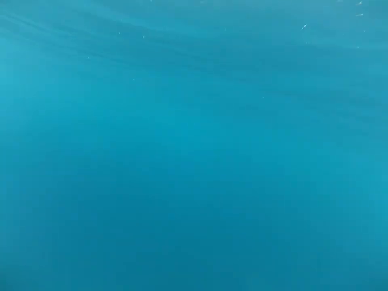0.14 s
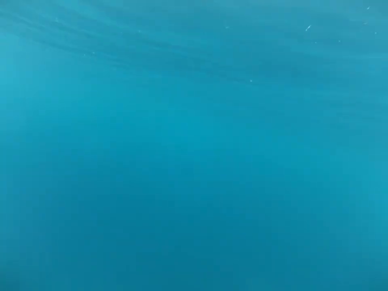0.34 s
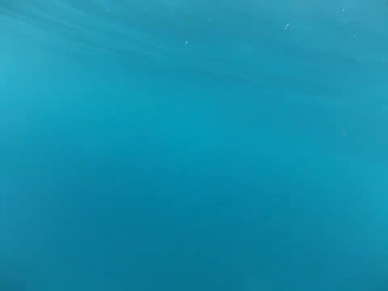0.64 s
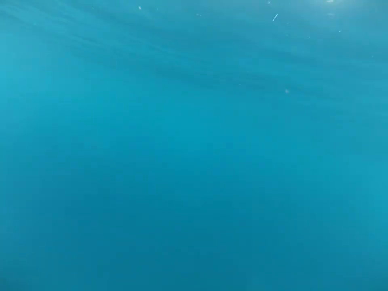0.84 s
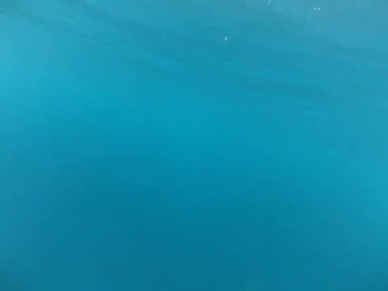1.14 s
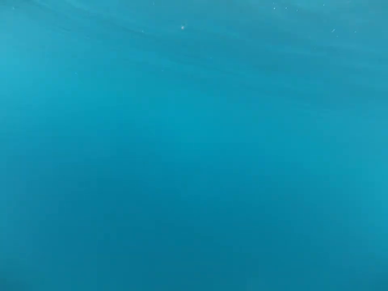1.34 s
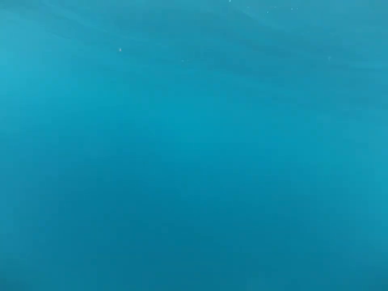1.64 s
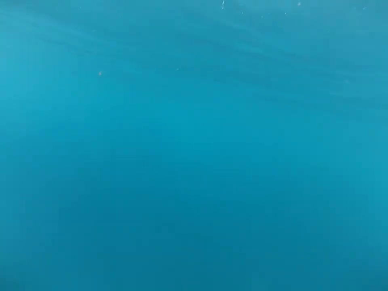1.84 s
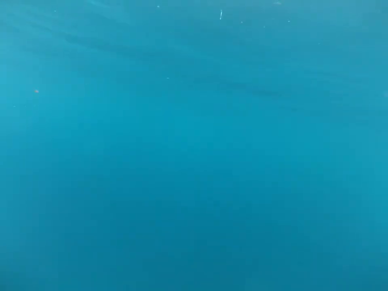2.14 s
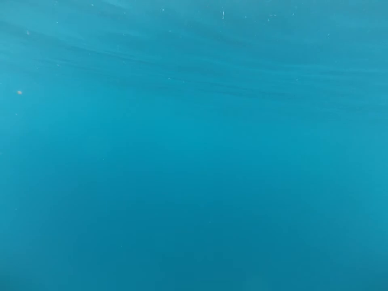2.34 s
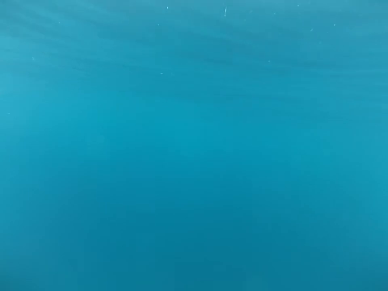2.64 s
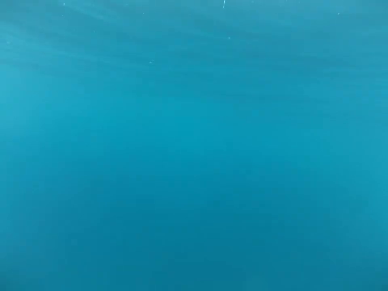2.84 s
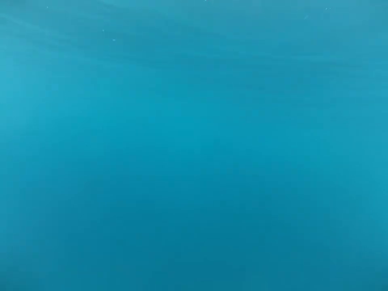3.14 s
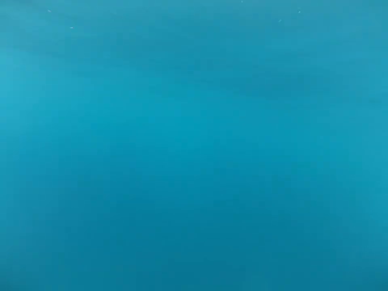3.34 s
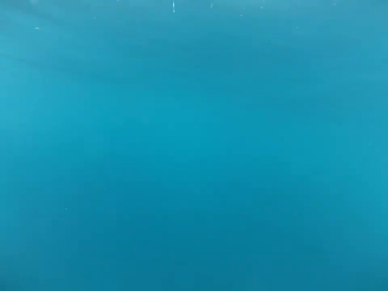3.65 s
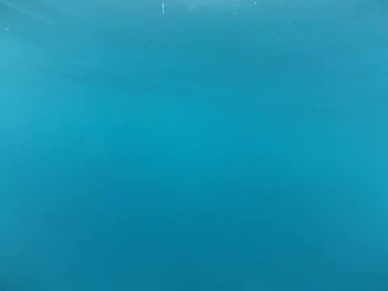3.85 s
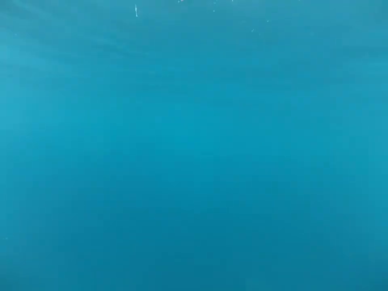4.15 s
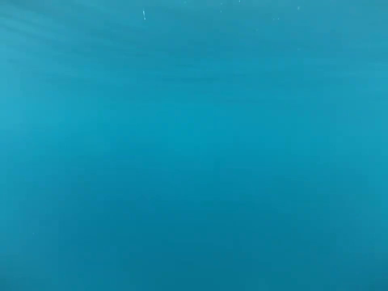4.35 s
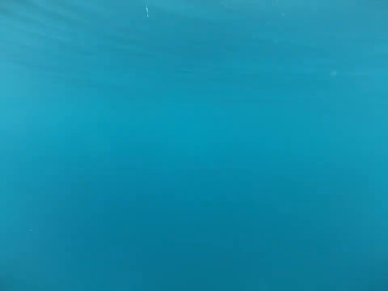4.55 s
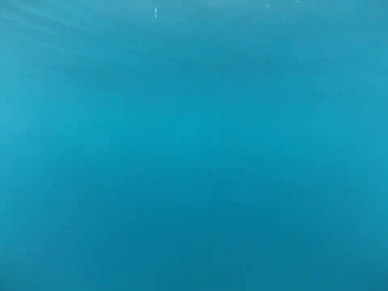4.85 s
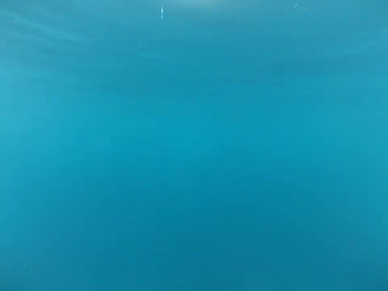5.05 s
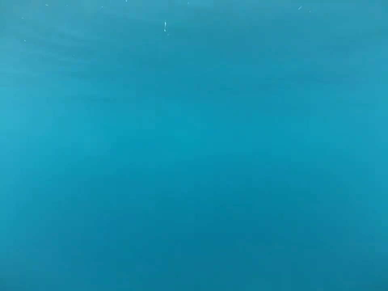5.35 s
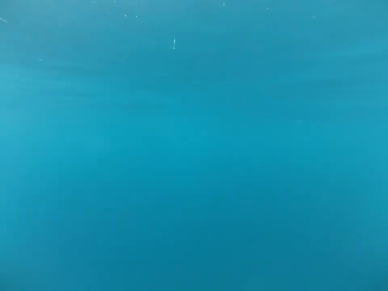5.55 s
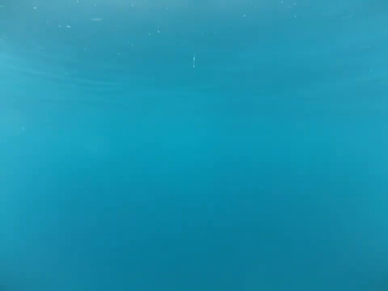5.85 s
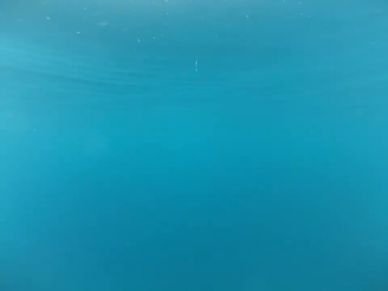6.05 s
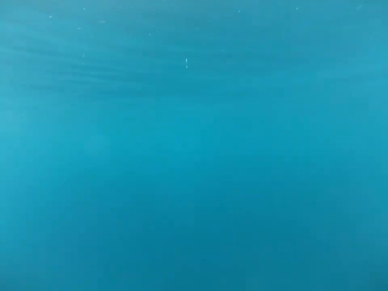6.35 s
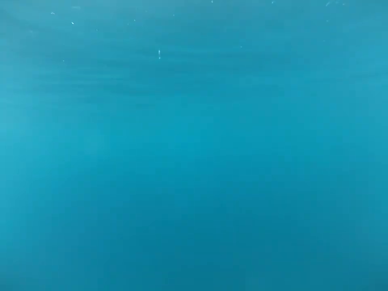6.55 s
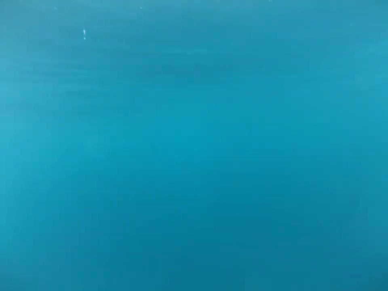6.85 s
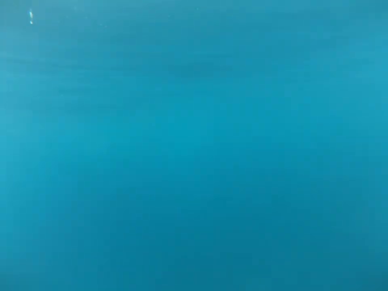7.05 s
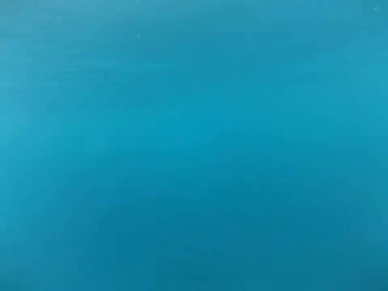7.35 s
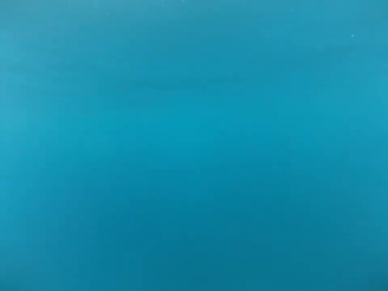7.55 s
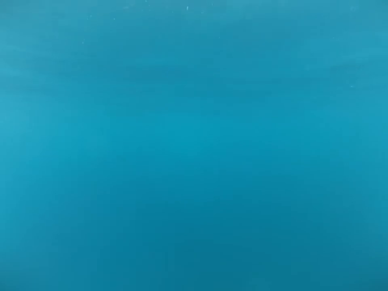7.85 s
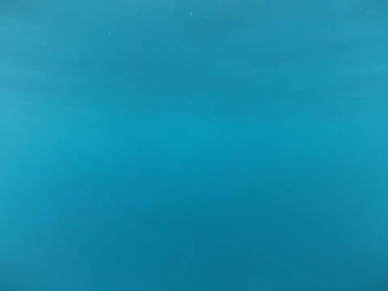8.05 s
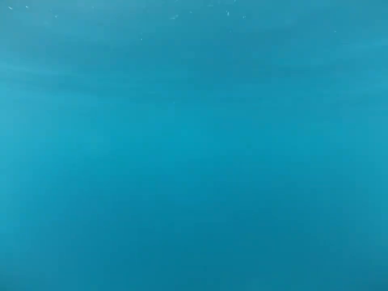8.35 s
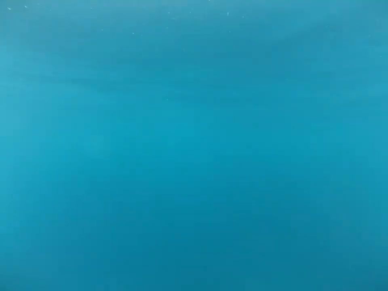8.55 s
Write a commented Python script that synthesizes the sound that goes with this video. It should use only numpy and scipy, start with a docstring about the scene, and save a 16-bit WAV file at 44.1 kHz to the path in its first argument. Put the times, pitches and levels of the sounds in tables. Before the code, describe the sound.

Heard underwater, a boat engine knocks and throbs in a rapid steady clatter over deep water rumble, with gulping bubbles and a rising, falling moan.

```python
"""Boat engine heard under water

Close to a boat, the microphone in a camera housing hears a six-cylinder engine: each firing rings the hull,
loose parts rattle, and steady engine and gear tones throb. Flow buffets the housing at a low pitch, over wash
with random low swells, hiss, bubble clicks and gulps. Far whines, perhaps a whale's, glide up and down.
The camera's electronics add clock overtones, bursts of treble ticks and one faint rough squeal."""
import sys
import numpy as np
from scipy import signal
from scipy.fft import rfft, irfft, next_fast_len
from scipy.io import wavfile
from scipy.ndimage import map_coordinates

SR = 44100
rng = np.random.default_rng(int(sys.argv[2]) if len(sys.argv) > 2 else 0)


def transcribe(signal):
    """Save signal, clipped to [-1, 1], as a 16-bit WAV file at the path in sys.argv[1]."""
    frames = np.atleast_2d(signal).T
    limited = np.clip(frames, -1, 1)
    pcm = np.round(limited * 32767).astype(np.int16)
    wavfile.write(sys.argv[1], SR, pcm)


def convert_level_to_amplitude(level_db):
    """Map a level in decibels to its linear amplitude factor."""
    exponent = np.asarray(level_db, float) / 20
    return 10 ** exponent


N = 383229

CYCLE_HZ = 8.313  # engine cycles a second
FIRST_FIRING = .25  # part of a cycle before the first cylinder fires
# drift of the engine's speed: (time [s], lag behind steady running [ms])
ENGINE_LAG = [(0.03, -0.3), (0.5, 1.6), (0.85, 1), (1.25, -2.5), (1.8, -0.5), (2.2, -2), (2.95, 1.5),
              (3.85, 3), (4.35, 1), (4.7, 2), (5.1, 0.4), (6.0, 0.2), (6.55, 1.36), (7.2, -3), (7.65, -1),
              (8.25, 3.5), (8.6, 0.5)]
# how early each of the six cylinders fires: (lead [ms])
CYLINDER_LEAD = [0, 0, 0, 1, 2, 2]
# hull resonances: (pitch [Hz], width [Hz], delay [ms], then peak level from cylinders 1-6 [dB])
HULL_RESONANCES = [(600, 110, 1, -40, -40, -38, -35, -35, -28.5),
                   (570, 110, 6, -35, -36, -44, -42, -40, -42),
                   (900, 190, .5, -52, -47, -48, -47, -45, -47),
                   (1265, 140, 2.5, -52, -53, -52, -45, -62, -64),
                   (1660, 220, 1, -46, -54, -41, -43, -52, -56),
                   (1735, 260, 0, -33, -46, -40, -40, -46, -49),
                   (2390, 240, -.5, -57, -70, -61, -62, -56, -68),
                   (2920, 300, 0, -60, -58, -56, -58, -55, -64),
                   (2980, 300, 5, -53, -68, -64, -62, -70, -70),
                   (3840, 200, 0, -70, -70, -69, -67, -65, -74),
                   (3860, 200, 6, -65, -80, -78, -72, -80, -80),
                   (7300, 600, -3, -67, -71, -69, -70, -62, -69)]
# engine and gear tones: (multiple of the cycle, level [dB rms])
THROB_TONES = [(6, -32.5), (9, -52.5), (63, -50), (72, -47)]
# colour of the loose parts' rattle: (frequency [Hz], relative density [dB per Hz])
RATTLE_COLOUR = [(1060, -43), (1130, -16.5), (1300, -11), (1385, -14), (1660, -4), (1950, -2.5),
                 (2190, -20), (2300, -13.5), (2480, -15.5), (2590, -18), (2900, -15.5), (3500, -26.5),
                 (3840, -26), (4200, -30.5), (4600, -50)]
# echoes cancel the engine here: (frequency [Hz], width [Hz], depth [0-1])
ECHO_NOTCHES = [(1380, 26, 0.26), (2593, 38, 0.73)]
# the camera rides the swell: period [s], lowest moment [s], share the knocks shift in pitch
SWELL_S, SWELL_LOW_S, SWELL_SHIFT = 4.76, 2.2, 0.012
# slow levels: (time [s], wash [dB rms], rattle [dB rms], trim of the hum [dB])
SLOW_LEVELS = [(0, -38, -54, -0.5), (2, -36, -51.5, 0), (4, -37, -52, 0.5), (6, -37, -51, 0.5),
               (8.7, -37.5, -50.5, 2.5)]

# strength of the flow past the housing, before trims: (time [s], level [dB])
FLOW_STRENGTH = [(0.0, -26.5), (0.51, -21.5), (1.02, -20), (1.53, -21), (2.04, -18.5), (2.55, -21.5),
                 (3.06, -21.5), (3.57, -20), (4.08, -24), (4.6, -22), (5.11, -21), (5.62, -25.5),
                 (6.13, -24), (6.64, -25.5), (7.15, -30), (7.66, -26.0), (8.17, -26), (8.68, -22)]
# the housing rocks in its mount: (frequency [Hz], relative density [dB per Hz])
ROCKING_COLOUR = [(20, -19), (26, -11), (30, -1), (33, -1), (36, -2.5), (41, -9.5), (47, -20.5)]
STEADINESS = 0.38  # 0 = swings as free as noise, 1 = constant swing
# colours of the low sway, the wash and the hiss: (frequency [Hz], relative density [dB per Hz])
SWAY_COLOUR = [(3, -17), (8, -14.5), (13, 4), (17, -5), (21, -17), (45, -0.5), (58, -6), (68, -24)]
WASH_COLOUR = [(55, 8), (70, -1), (115, 0.5), (150, -3.5), (178, -12.5), (205, -6.5), (290, -9), (370, -13),
               (420, -9.5), (490, -1), (545, -8), (600, -4.5), (650, -4), (800, -20.5), (850, -11),
               (950, -20), (1050, -17.5), (1130, -38.5), (1200, -60)]
HISS_COLOUR = [(3600, -32), (4300, -6.5), (4930, 0), (6460, -5), (7030, 1), (7360, 2), (8060, -3.5),
               (9440, -6.5), (13500, -7), (15500, -15)]
# loud bubble clicks: (time [s], peak level [dB], pitch [Hz])
LOUD_CLICKS = [(0.1835, -41, 4280), (0.5377, -44, 4000), (0.616, -42, 7120), (1.5633, -43, 7370),
               (1.8022, -40, 4800), (1.9066, -44, 4480), (2.0936, -46, 4140), (2.143, -42, 4290),
               (2.6688, -46, 4030), (2.6828, -43, 4100), (2.7275, -45, 4030), (3.8931, -45, 7210),
               (4.0457, -42, 4380), (4.2363, -41, 8330), (8.2301, -36, 7900), (8.6329, -42, 7420)]
# gulps of air: (time [s], peak level of each bubble [dB], middle pitch [Hz], time to swell [s])
GULP_BUBBLES = [(.45, -36, 235, .008), (.55, -39, 330, .012), (3.96, -42, 310, .008),
                (6.124, -28, 335, .008), (6.124, -35, 480, .006), (6.141, -29, 395, .009)]
# random low swells of the wash, commonest midway: (start [s], end [s])
WASH_SWELLS = (1.5, 5.5)

# arched whines: (time of the top [s], top pitch [Hz], top level [dB rms], rise [s], fall [s])
WHINE_ARCHES = [(.4, 660, -43, .45, .15), (1.35, 290, -50, .5, .4), (4.52, 492, -32, .26, .36)]
# share of pitch and level lost one rise before or one fall after the top; level of the octave
WHINE_SAG, WHINE_FADE_DB, WHINE_OCTAVE_DB = .2, 14, -20

CLOCK_HZ = 81.92  # clock of the camera's electronics
# overtones of the clock, before the slow trim: (multiple of the clock, level [dB rms])
HUM_OVERTONES = [(3, -43), (4, -61), (5, -49), (6, -53), (7, -50.5), (8, -51), (10, -65), (11, -64),
                 (12, -60), (14, -81), (15, -63), (30, -76)]
# bursts of ticks at the clock rate: (time [s], count of ticks)
TICK_BURSTS = [(.136, 2), (.166, 1), (.446, 5), (.735, 4), (1.06, 1), (4.295, 2), (4.663, 4), (5.076, 4),
               (5.174, 4), (5.242, 1), (5.552, 5), (5.863, 1), (5.879, 2), (6.153, 5), (6.563, 4),
               (6.864, 4), (7.172, 4), (7.566, 2), (7.596, 1), (7.923, 5), (8.148, 2), (8.179, 3),
               (8.555, 5)]
# pings that make up one tick: (pitch [Hz], middle peak level [dB])
TICK_PINGS = [(9400, -61.5), (10000, -59), (13000, -55), (9600, -57), (11570, -53.5), (13300, -61)]
# when each of those pings peaks within the tick: (offset [ms])
TICK_OFFSETS = [-6.5, -4, 0, 1, 1.7, 6]
# the squeal: (pitch [Hz], level [dB], level of its octave [dB])
SQUEAL_TONE = (4860, -69, -68)
# when it sounds: (start [s], end [s])
SQUEAL_TIMES = (1.348, 1.486)


def unit(x):
    """Scale to rms 1."""
    return x / np.sqrt(np.mean(x ** 2) + 1e-20)


def curves(rows):
    """One value per sample for each column after the time."""
    s, *columns = np.transpose(rows)
    return [np.interp(np.arange(N) / SR, s, column) for column in columns]


def wobble(rate):
    """A smooth random curve, rate knots a second."""
    knots = rng.standard_normal(int(N * rate / SR) + 4)
    return map_coordinates(knots, [np.arange(N) * rate / SR])


def filtered(x, response):
    """x times a response of frequency."""
    m = next_fast_len(N + 8192)
    return irfft(rfft(x, m) * response(np.fft.rfftfreq(m, 1 / SR)), m)[:N]


def noise(spectrum):
    """Noise of rms 1 with a (Hz, dB) colour, drawn over log frequency."""
    f, db = np.transpose(spectrum)
    colour = lambda hz: convert_level_to_amplitude(np.interp(np.log(hz + 1), np.log(f + 1), db, -120, -120))
    return unit(filtered(rng.standard_normal(N), colour))


def tone(hz):
    """A sine of rms 1 that follows a pitch curve, from a random phase."""
    cycles = np.cumsum(hz + np.zeros(N)) / SR + rng.random()
    return np.sqrt(2) * np.sin(2 * np.pi * cycles)


def pings(s, gain, hz, life):
    """Short tone bursts that swell and die, time constant life, peaking at s with random phase."""
    s, gain, hz, life = (np.ravel(v)[:, None] for v in np.broadcast_arrays(s, gain, hz, life))
    step = np.arange(int(12 * life.max() * SR))
    u = step / SR / life
    envelope = gain * (u / 2) ** 2 * np.exp(2 - u)  # reaches gain at two lives
    wave = envelope * np.sin(2 * np.pi * (hz * step / SR + rng.random(s.shape)))
    at = np.round((s - 2 * life) * SR).astype(int) + step
    inside = (at >= 0) & (at < N)
    return np.bincount(at[inside], wave[inside], N)


def engine():
    """Firings ring the hull and loose parts rattle, both notched by echoes; engine and gear tones throb."""
    turn = CYCLE_HZ * (np.arange(N) / SR - curves(ENGINE_LAG)[0] / 1000)  # cycles run so far
    knocks = hull_knocks()
    throb = sum(np.sqrt(2) * convert_level_to_amplitude(db + 0.71 * wobble(3.3)) * np.sin(2 * np.pi * k * turn)
                for k, db in THROB_TONES)
    echoes = lambda f: np.prod([1 - depth * np.exp(-((f - hz) / width) ** 2)
                                for hz, width, depth in ECHO_NOTCHES], axis=0)
    return filtered(knocks + loose_parts(turn), echoes) + throb


def hull_knocks():
    """Each firing rings every hull resonance at its cylinder's strength; wider resonances die sooner."""
    steady = (np.arange(-6, 6 * int(N / SR * CYCLE_HZ + 1)) / 6 + FIRST_FIRING) / CYCLE_HZ
    fired = steady + np.interp(steady, *np.transpose(ENGINE_LAG)) / 1000
    lead = np.resize(CYLINDER_LEAD, len(fired))
    swell = 1 - SWELL_SHIFT * np.cos(2 * np.pi * (fired - SWELL_LOW_S) / SWELL_S)
    knocks = np.zeros(N)
    for hz, width_hz, delay, *cylinder_db in HULL_RESONANCES:
        chance = rng.standard_normal((len(fired), 3))
        when = fired + (delay - lead + .35 * chance[:, 0]) / 1000
        strength = convert_level_to_amplitude(np.resize(cylinder_db, len(fired)) + .8 * chance[:, 1])
        pitch = hz * swell + .12 * width_hz * chance[:, 2]
        knocks += pings(when, strength, pitch, .33 / width_hz)
    return knocks


def loose_parts(turn):
    """Rattling noise that swells after a firing and lulls before the next."""
    shaken = np.sin(2 * np.pi * 6 * (turn - FIRST_FIRING))
    return convert_level_to_amplitude(curves(SLOW_LEVELS)[1] + 1.6 * shaken + 1.5 * wobble(60)) * noise(RATTLE_COLOUR)


def water():
    """Flow buffets the housing, over low sway, wash and its swells, grainy hiss, clicks and gulps of air."""
    flow_db, = curves(FLOW_STRENGTH)
    buffet = housing_buffet(flow_db)
    sway = convert_level_to_amplitude(-29.0 + 0.79 * (flow_db + 21.0) + 2.1 * wobble(6)) * noise(SWAY_COLOUR)
    wash = convert_level_to_amplitude(curves(SLOW_LEVELS)[0] + 1.13 * wobble(30)) * noise(WASH_COLOUR)
    hiss = convert_level_to_amplitude(-66.5 + 1.7 * wobble(150)) * noise(HISS_COLOUR)
    return buffet + sway + wash + hiss + crackle() + gulps() + wash_swells(flow_db)


def housing_buffet(flow_db):
    """Flow rocks the housing in its mount: narrow low noise, its swings partly evened out."""
    rock = noise(ROCKING_COLOUR)
    swing = np.abs(signal.hilbert(rock, next_fast_len(N))[:N])
    return convert_level_to_amplitude(flow_db - 0.66) * unit(rock / (swing + .1) ** STEADINESS)


def wash_swells(flow_db):
    """Random low swells of the wash near 126 Hz, commonest midway through their span, louder in strong flow."""
    a, b, size, pitch = rng.random((12, 4)).T
    s = np.interp(a + b, (0, 2), WASH_SWELLS)
    gain = convert_level_to_amplitude(flow_db[(s * SR).astype(int)] - 11.5 + 3.6 * (size - .5))
    return pings(s, gain, 125.7 * (1 + .3 * (pitch - .5)), 0.01516)


def gulps():
    """Each gulp is a cluster of bubbles of unlike size let go at once."""
    s, db, hz, swell_s = (c[:, None] for c in np.transpose(GULP_BUBBLES))
    chance = rng.standard_normal((len(GULP_BUBBLES), 2, 3))  # three bubbles to a row
    return pings(s + .002 * chance[:, 0], convert_level_to_amplitude(db), hz * np.exp(.05 * chance[:, 1]), swell_s / 2)


def crackle():
    """Tiny bubbles snap: a few loud broad clicks, some middling ones and a random sprinkle of faint ones."""
    at, size, pitch = rng.random((18, 3)).T
    middling = [at * N / SR, np.interp(size, (0, 1), (-54, -48)), np.interp(pitch ** 3, (0, 1), (4000, 7500))]
    s, db, hz = np.hstack([np.transpose(LOUD_CLICKS), middling])
    clicks = pings(s, convert_level_to_amplitude(db), hz, .3 / hz)  # about one cycle
    chance = rng.random((250, 3))
    faint = convert_level_to_amplitude(-68 + 12 * chance[:, 1] ** 2)
    return clicks + pings(chance[:, 0] * N / SR, faint, 4500 + 5000 * chance[:, 2], .00008)


def whine():
    """Far tones with a weak octave glide up and back down, loudest at the top, like the moans of a whale."""
    out = np.zeros(N)
    for top_s, top_hz, db, rise, fall in WHINE_ARCHES:
        span = np.arange(max(0, int((top_s - 2 * rise) * SR)), int((top_s + 2 * fall) * SR))
        t = span / SR - top_s
        arch = (t / np.where(t < 0, rise, fall)) ** 2  # 0 at the top
        phase = 2 * np.pi * np.cumsum(top_hz * (1 - WHINE_SAG * arch ** .9)) / SR
        voice = np.sin(phase) + convert_level_to_amplitude(WHINE_OCTAVE_DB) * np.sin(2 * phase)
        out[span] += np.sqrt(2) * convert_level_to_amplitude(db - WHINE_FADE_DB * arch ** .7) * voice
    return out


def electronics():
    """The camera's own noise: hum of overtones on a barely drifting clock, ticks and a squeal."""
    drift = CLOCK_HZ + 0.0296 * wobble(0.698)
    overtones = sum(convert_level_to_amplitude(db + 0.47 * wobble(2.67)) * tone(k * drift) for k, db in HUM_OVERTONES)
    hum = convert_level_to_amplitude(curves(SLOW_LEVELS)[2]) * overtones
    return hum + clock_ticks() + squeal()


def clock_ticks():
    """Bursts at the clock rate, each tick a spray of very short treble pings."""
    s = np.concatenate([start + np.arange(count) / CLOCK_HZ for start, count in TICK_BURSTS])[:, None]
    hz, db = np.transpose(TICK_PINGS)
    strength = convert_level_to_amplitude(db + 1.2 * rng.standard_normal((len(s), len(TICK_PINGS))))
    return pings(s + np.array(TICK_OFFSETS) / 1000, strength, hz, 0.00034)


def squeal():
    """A brief tone and its octave, made rough by quick wavering of pitch and level."""
    (start, end), (hz, db, octave_db) = SQUEAL_TIMES, SQUEAL_TONE
    t = np.arange(N) / SR
    pitch = hz * (1 + .012 * wobble(250))
    rough = convert_level_to_amplitude(4 * wobble(400))
    tones = convert_level_to_amplitude(db) * tone(pitch) + convert_level_to_amplitude(octave_db) * tone(2 * pitch)
    return ((t > start) & (t < end)) * unit(rough) * tones


def scene():
    """All sources meet at one microphone."""
    return (engine() + water() + whine() + electronics())[None]


def roll_off(x):
    """The treble ends steeply here."""
    return signal.sosfilt(signal.butter(12, 15570, fs=SR, output="sos"), x)


def record(dry):
    """The camera keeps the microphone's mix at the level it arrives."""
    return roll_off(dry)


dry = scene()
out = record(dry)
transcribe(out)
```